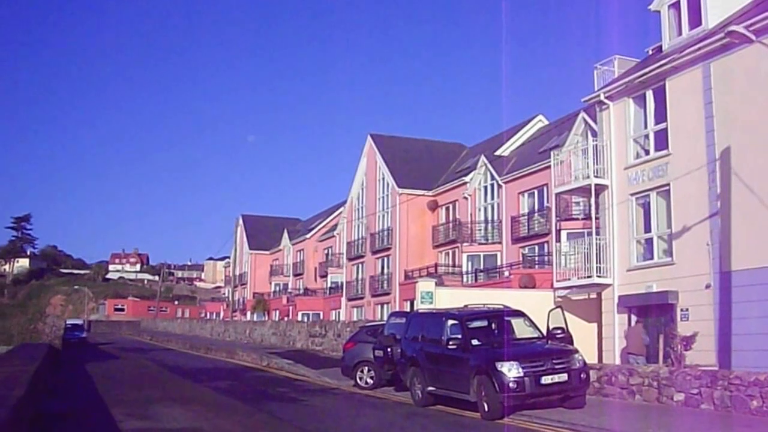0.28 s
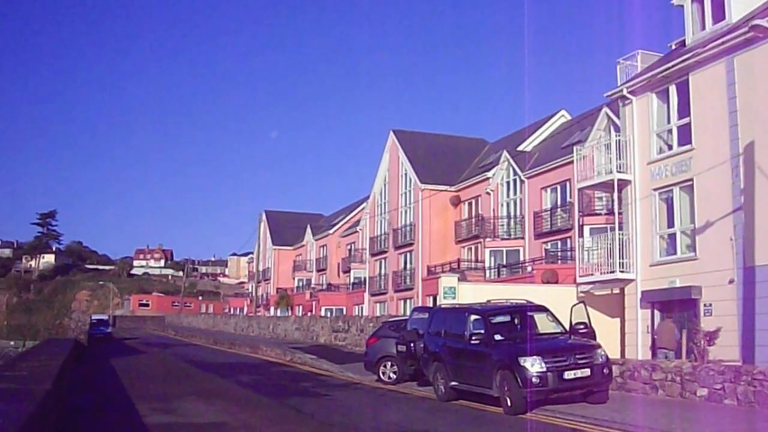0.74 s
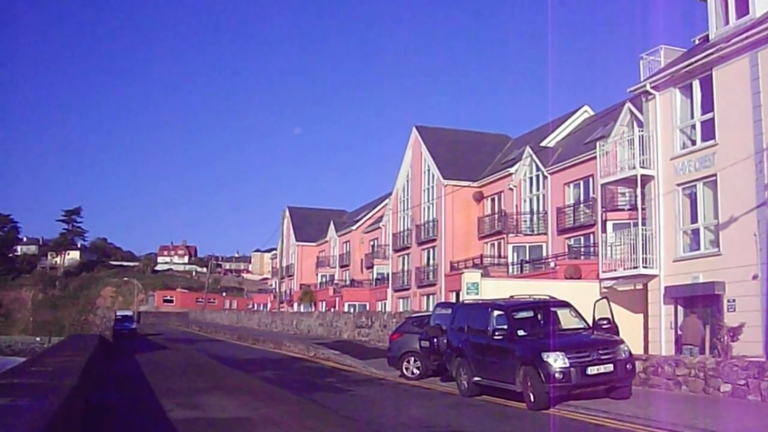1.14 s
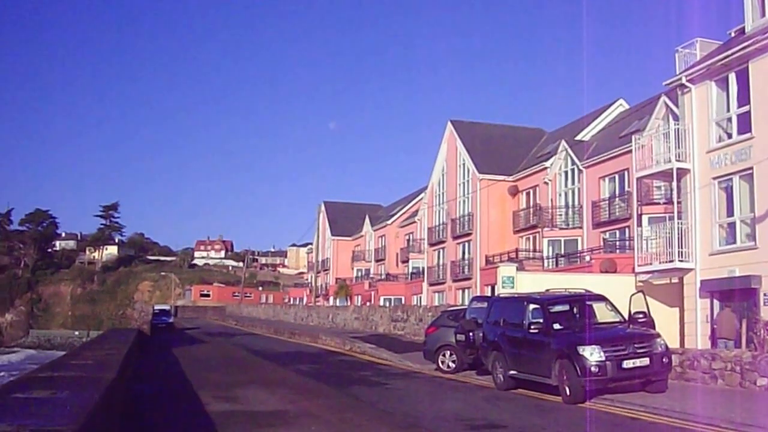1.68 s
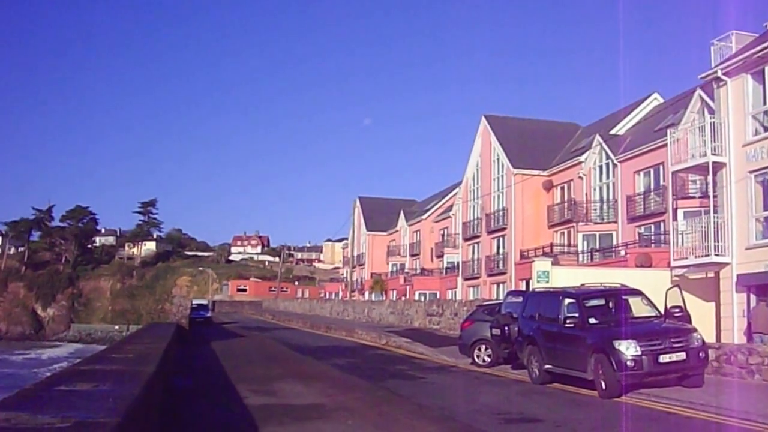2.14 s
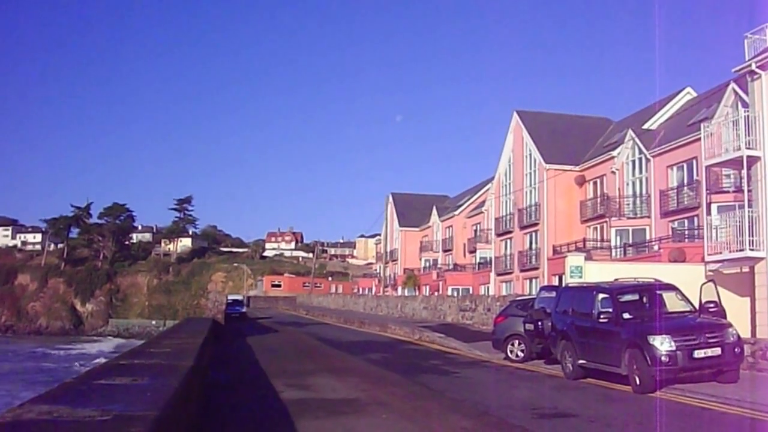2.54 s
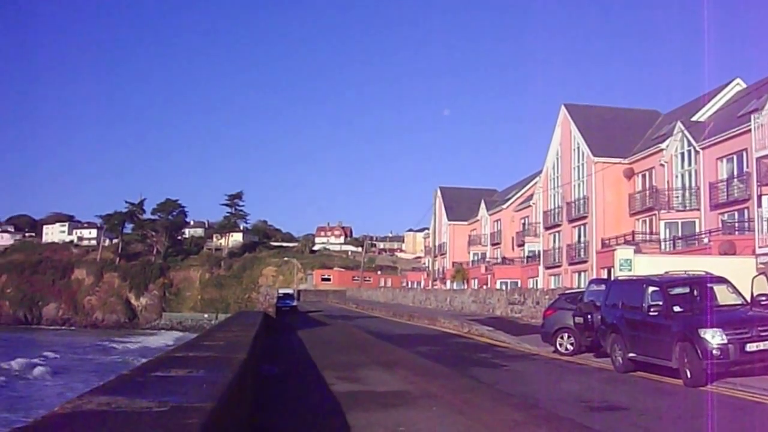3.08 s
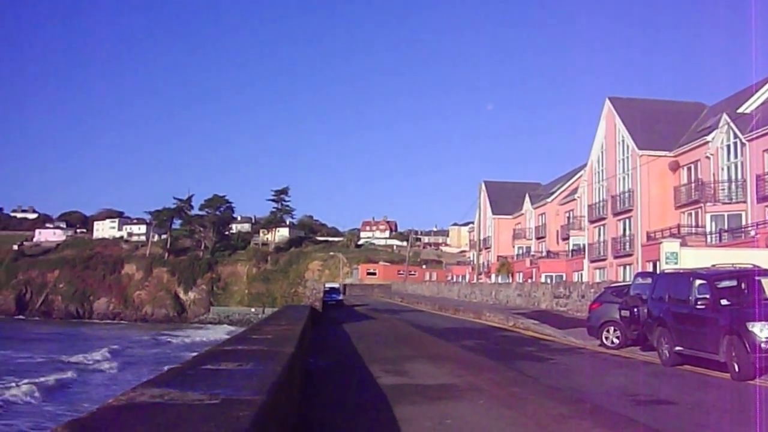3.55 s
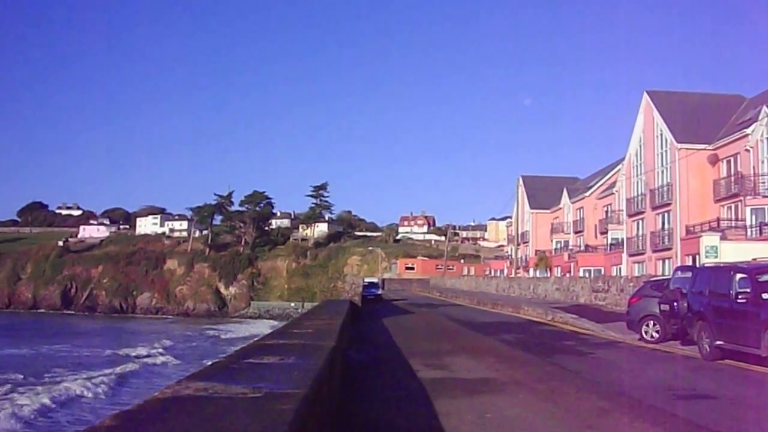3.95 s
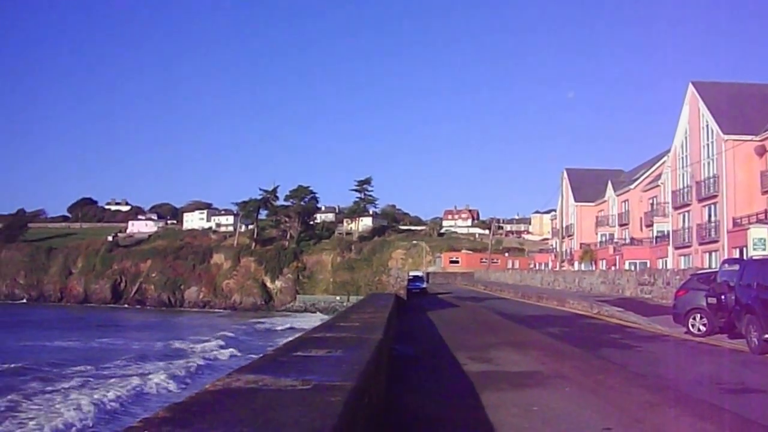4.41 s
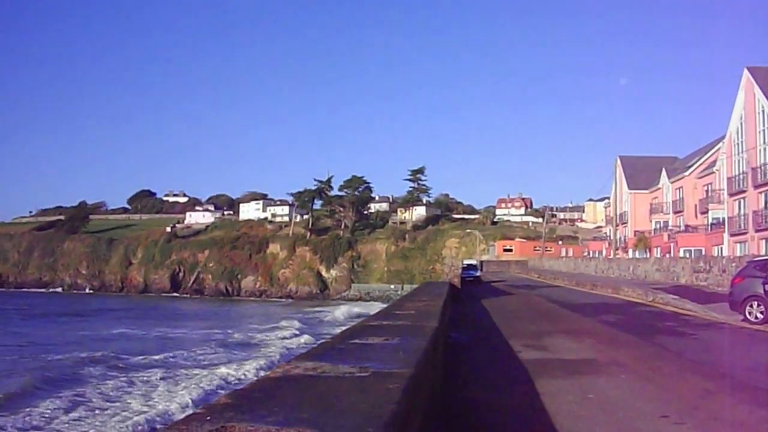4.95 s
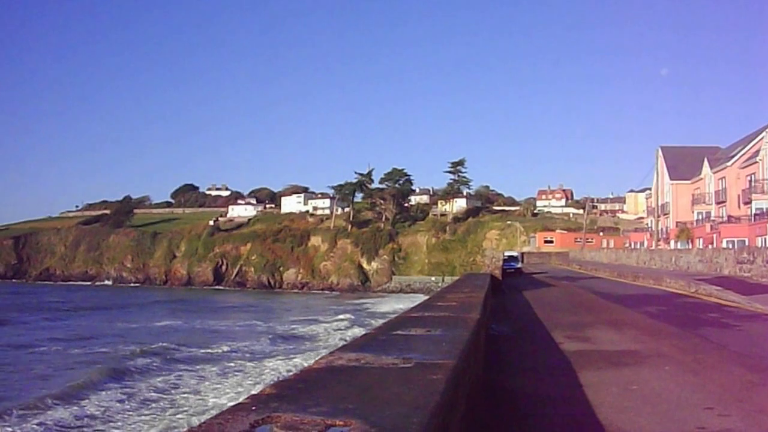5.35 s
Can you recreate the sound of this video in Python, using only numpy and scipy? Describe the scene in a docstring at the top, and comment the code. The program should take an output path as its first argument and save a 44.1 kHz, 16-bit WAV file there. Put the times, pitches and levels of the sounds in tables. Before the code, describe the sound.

A full, mostly low and middling sea roar runs throughout, with little treble and a bubbly hiss on top. Sharp case clicks and a distorted pop interrupt the opening, much louder than the water. Soft booms surface now and then. Near three seconds wind buffets the microphone in quick low thuds, then a stronger wave washes along the wall, and a short gust rumbles at the end.

```python
"""On a windy seafront, rough surf runs along a sea wall, heard through a small hand-held camera.
The surf is shaped noise: broken water roars, booms and washes while foam hisses with ringing bubbles.
Wind is low noise that follows gusts; eddies buffet the microphone with push-to-suction pulses.
Early on, contacts set the camera's case ringing in a few clicks, and one pressure pulse pops
and briefly chokes the microphone."""
import sys
import numpy as np
from scipy import signal
from scipy.fft import rfft, irfft
from scipy.io import wavfile

SR = 44100
rng = np.random.default_rng(int(sys.argv[2]) if len(sys.argv) > 2 else 0)


def wav_out(sig):
    """Save sig, one row per channel (or a flat mono array), as 16-bit PCM at SR to the path in sys.argv[1]."""
    wavfile.write(sys.argv[1], SR, np.round(np.clip(np.atleast_2d(sig).T, -1, 1) * 32767).astype(np.int16))


N = 246736
TIME = np.arange(N) / SR

# Relative spectra of roaring water, plunging booms, wash along the wall, foam and wind rumble:
# (frequency [Hz], relative level per hertz [dB])
ROAR_SPECTRUM = [(60, -22.5), (110, -5), (155, 0), (215, 0), (315, -0.5), (430, -2), (620, -3.5), (850, -4),
                 (1100, -9), (1400, -15.5), (1700, -22.5), (2300, -25.5), (3000, -40.5), (6000, -54)]
BOOM_SPECTRUM = [(90, -42), (240, 7.5), (320, 10), (410, 1.5), (650, -39), (2000, -89.5)]
WASH_SPECTRUM = [(400, -14), (700, -2), (1100, -0.5), (1450, 0.5), (1900, -9.5), (2800, -26), (6000, -59.5)]
FOAM_SPECTRUM = [(700, -4), (1500, 5.5), (1900, 5), (2350, 7.5), (2600, 2.5), (2850, -2.5), (3250, -3),
                 (3800, 1.5), (4250, -4), (4700, -4.5), (5300, -13), (5900, -19.5), (6400, -21.5),
                 (7000, -47)]
RUMBLE_SPECTRUM = [(10, -4.5), (25, 0.5), (50, 1), (90, 0.5), (150, -4.5), (300, -20.5), (700, -30.5),
                   (2000, -52.5)]

# Two waves running along the wall, the second stronger:
# (time [s], roar level [dB], boom level [dB], wash level [dB], foam level [dB])
SWELL_LEVELS = [(0, -25.5, -38, -45.5, -39), (0.5, -25, -38, -47, -39), (0.95, -24.9, -41, -41, -38.5),
                (1.25, -24, -35, -41, -38.5), (1.6, -24, -34, -39.5, -38), (2.3, -23, -35, -40.5, -37.5),
                (2.85, -24, -36, -47, -37.5), (3.15, -22, -38, -41, -37.5),
                (3.55, -22.9, -27.5, -38.5, -37), (4, -23.5, -33, -35.5, -37),
                (4.5, -23.5, -38, -37, -37.5), (4.85, -24.5, -31, -34.5, -37.5),
                (5.049, -24.5, -38.5, -38.5, -38), (5.59, -24.4, -39.5, -41.5, -38)]

# Gusts and lulls: (time [s], level over the breeze [dB], rise [s], fall [s])
WIND_GUSTS = [(0.1, -1.5, .15, .2), (0.62, 3, .1, 0.14), (1.369, 4, .05, 0.06), (2.11, 3.5, 0.072, 0.18),
              (2.881, 10.5, 0.035, 0.055), (3.05, 5.5, 0.14, 0.27), (3.38, 3.5, 0.064, 0.13),
              (5.2, -3.5, 0.14, 0.15), (5.58, 7.5, 0.065, 0.049)]

# Case contacts, the loud ones in quick pairs of strike and rebound:
# (time [s], ringing level [dB], centre of colour [Hz], spread of colour [octaves], crack level [dB])
CASE_CONTACTS = [(0.17893, -1, 1420, 0.26, -38), (0.18042, -4.5, 2765, 0.085, -36),
                 (0.33946, -8.5, 3950, 1.6, -21), (0.34044, -0.5, 3055, 0.17, -3.5),
                 (0.6195, -22, 1835, 0.8, -28), (0.63428, -5.3, 1850, 0.62, -10),
                 (0.63524, -10.5, 2250, 0.7, -20), (0.644, -23, 2440, 0.7, -28)]

# Resonant modes of the case: (frequency [Hz], relative level [dB], 60 dB decay time [s])
CASE_MODES = [(977, 1.5, .009), (1395, -9, 0.019), (1778, -0.6, 0.0046), (2469, -3.7, 0.015),
              (2769, -11.3, 0.012), (3603, -2.2, 0.009), (4892, -7, 0.006), (5813, -7, 0.003)]

# Eddies striking the microphone: (time [s], peak of the swing [dB], length of the swing [s],
# steepness of its front [ratio], lean [1 all push, -1 all suction])
EDDY_BUFFETS = [(0.2838, -11, 0.003, 1, 0), (0.3395, -9, .004, 3, .4), (2.891, -17, 0.008, 1.2, .6),
                (2.982, -9.5, 0.027, 1.3, .15), (3.012, -15, 0.024, 1, .7), (3.0439, -6.5, 0.006, 4, .1),
                (3.0568, -12, 0.0012, 1, 0), (3.0583, -4.5, 0.0055, 1, -.9), (3.15, -15, 0.022, 1, -.7),
                (3.1775, -10, 0.003, .9, .8), (3.335, -19, 0.018, 1, 0)]

# Plunging crests that trap throbbing air clouds:
# (time [s], level [dB], pitch [Hz], half length [s])
PLUNGING_CRESTS = [(1.004, -28, 320, .07), (1.594, -29, 280, 0.046), (2.272, -26, 215, 0.056),
                   (3.834, -30.5, 320, 0.15), (4.128, -33, 310, 0.046), (4.9, -30.5, 185, 0.057)]

BREEZE_DB, SLACKEN_DB_PER_S = -30, 0.37
LUMPY_DB = 1   # unevenness of the rumble
CRACK_T60_S = 0.0007
# tearing against the swing at a reference length, and its loss per doubling of that length
TEAR_DB, TEAR_REFERENCE_S, TEAR_LOSS_DB = -19, 0.008, 1.5
POP_S = 0.31145
CLOUD_OCTAVES = 0.5   # bandwidth of a cloud's throb
START_S, FADE_IN_S = 0.025, 0.027
MIC_TOP_HZ, CUTOFF_HZ = 6400, 15000


def from_db(db):
    """Logarithmic level: 20 dB is a tenfold amplitude ratio."""
    return 10 ** (np.asarray(db) / 20)


def rms_one(x):
    """Power normalisation: divide by the root mean square."""
    return x / np.sqrt(np.mean(x ** 2) + 1e-20)


def coloured(x, spectrum):
    """Spectral shaping: weight each frequency, then scale to unit power."""
    hz, db = np.transpose(spectrum)
    grid = np.maximum(np.arange(N // 2 + 1) * SR / N, 1)
    gain = from_db(np.interp(np.log(grid), np.log(hz), db))
    return rms_one(irfft(rfft(x) * gain, N))


def drift(rate):
    """Low-passed noise: a random course of unit spread, changing about rate times a second."""
    step = 40   # samples between slow values
    r = np.exp(-2 * np.pi * rate * step / SR)
    steps = rng.standard_normal(N // step + 2002)
    slow = signal.lfilter([1], [1, -2 * r, r * r], steps)[2000:]   # settled part
    return np.interp(np.arange(N) / step, np.arange(len(slow)), rms_one(slow))


def ring(impulses, hz, t60):
    """Damped resonance: each unit impulse excites an exponentially decaying sine."""
    r = np.exp(-np.log(1000) / (t60 * SR))
    w = 2 * np.pi * hz / SR
    return signal.lfilter([0, np.sin(w)], [1, -2 * r * np.cos(w), r * r], impulses + 1e-18)


def band_noise(white, band):
    """Band-pass filtering: keep the noise between two frequencies."""
    return signal.sosfilt(signal.butter(2, band, "band", fs=SR, output="sos"), white)


def churn(patchy_db, rate, count=14):
    """Bubble-cloud noise: bands swell separately as clouds of different sizes form and die."""
    edges = np.geomspace(50, 8000, count + 1)
    white = rng.standard_normal((2, N))
    out = 0
    for k, band in enumerate(zip(edges, edges[1:])):
        noise = band_noise(white[k % 2], band)   # neighbours use independent noise
        out = out + noise * from_db(patchy_db * drift(rate))
    return rms_one(out)


def bubbles(per_s, spread_db, cycles, count=24):
    """Bubble resonance: bursts in clumps ring at set pitches, decaying 60 dB in a few cycles."""
    sizes = from_db(spread_db * np.minimum(rng.exponential(1, N), 4)) * rng.choice([-1, 1], N)
    chance = per_s * from_db(3 * drift(7)) / SR
    bursts = sizes * (rng.random(N) < chance)
    dealt = rng.integers(0, count, N)   # pitch number of each burst
    out = np.zeros(N)
    for k, hz in enumerate(np.geomspace(900, 6000, count)):
        out += hz * ring(bursts * (dealt == k), hz, cycles / hz)
    return rms_one(out)


def surf():
    """Turbulent bubbly flow: water roars, booms and washes; its foam hisses and fizzes."""
    s, *levels = np.transpose(SWELL_LEVELS)
    roar_db, boom_db, wash_db, foam_db = [np.interp(TIME, s, db) for db in levels]
    roar = from_db(roar_db) * coloured(churn(patchy_db=0.5, rate=5.0), ROAR_SPECTRUM)
    boom = from_db(boom_db) * coloured(churn(patchy_db=3.0, rate=3.9), BOOM_SPECTRUM)
    wash = from_db(wash_db) * coloured(churn(patchy_db=0.5, rate=10), WASH_SPECTRUM)
    hiss = churn(patchy_db=0.74, rate=21)
    fizz = from_db(-10) * bubbles(per_s=3000, spread_db=1.0, cycles=6)
    foam = from_db(foam_db) * coloured(hiss + fizz, FOAM_SPECTRUM)
    unevenness = from_db(0.19 * drift(11))
    return (roar + boom + plunges() + wash + foam) * unevenness


def wind():
    """Turbulent pressure at the microphone port: a lumpy low rumble swells and dies with gusts."""
    gust_db = 0
    for s, db, rise, fall in WIND_GUSTS:
        past = TIME - s
        gust_db = gust_db + db * np.exp(-(past / np.where(past < 0, rise, fall)) ** 2)
    rumble_db = BREEZE_DB - SLACKEN_DB_PER_S * TIME + gust_db
    lumps = rng.standard_normal(N) * from_db(LUMPY_DB * drift(21))
    return from_db(rumble_db) * coloured(lumps, RUMBLE_SPECTRUM)


def case_clicks():
    """Modal excitation: a contact cracks and rings the case, favouring modes near its colour."""
    s, db, centre_hz, octaves, crack_db = np.transpose(CASE_CONTACTS)
    out = np.zeros(N)
    for start, hz, gain in zip(s, centre_hz, from_db(crack_db)):
        out += gain * ring(np.arange(N) == round(start * SR), hz, CRACK_T60_S)
    for k, (hz, mode_db, t60) in enumerate(CASE_MODES):
        nearness = np.exp(-.5 * (np.log2(hz / centre_hz) / octaves) ** 2)
        taps = np.zeros(N)
        taps[np.round(s * SR).astype(int)] = from_db(db + mode_db) * nearness
        out += (-1) ** k * ring(taps, hz, t60)   # modes alternate in sign
    return out


def buffets():
    """Vortex passage: pressure flips from push to suction, by its lean, as the air tears a little."""
    out = np.zeros(N)
    tearing = coloured(rng.standard_normal(N), ROAR_SPECTRUM)
    for s, db, length, steepness, lean in EDDY_BUFFETS:
        u = 4 * (TIME - s) / length
        passing = np.exp(-u * u / 2)
        swing = (lean - np.tanh(steepness * u)) * passing
        swing = swing / np.abs(swing).max()
        # quick eddies tear more
        tear_db = TEAR_DB - TEAR_LOSS_DB * np.log2(length / TEAR_REFERENCE_S)
        out += from_db(db) * (from_db(tear_db) * tearing * passing + swing)
    return out


def pop(air, pulse_db=10, pulse_s=0.00123, creep_db=1.5, fall_s=0.0011, choke_db=-11, recover_s=0.016):
    """Overload and recovery: a pulse pins the microphone, which creeps back and stays weak briefly."""
    after = TIME >= POP_S
    since = np.maximum(TIME - POP_S, 0)
    stroke = np.minimum(since / pulse_s, 1)
    # the levels scale these shapes, whose own peaks lie below 1
    pulse = from_db(pulse_db) * np.sin(np.pi * stroke) * (1 - stroke)   # sharp front, slower back
    creep = from_db(creep_db) * stroke * np.exp(-since / fall_s)
    sensitivity = from_db(choke_db * after * np.exp(-(since / recover_s) ** 2))
    return air * sensitivity - pulse - creep


def plunges():
    """Collective bubble oscillation: each crest's air cloud swells and fades at its low pitch."""
    out = np.zeros(N)
    for s, db, hz, half_length in PLUNGING_CRESTS:
        band = hz * 2 ** (CLOUD_OCTAVES * np.array([-.5, .5]))
        cloud = rms_one(band_noise(rng.standard_normal(N), band))
        out += from_db(db) * cloud * np.exp(-((TIME - s) / half_length) ** 2)
    return out


def scene():
    """Superposition: sea, wind and case sounds add at one microphone, which the pop chokes."""
    return pop(surf() + wind() + case_clicks() + buffets())[None, :]


def record(dry):
    """Band limitation and clipping: sound fades in from silence, a narrow microphone limits it,
    peaks flatten and the top is cut."""
    faded_in = dry * np.clip((TIME - START_S) / FADE_IN_S, 0, 1)
    narrow = signal.sosfilt(signal.butter(26, MIC_TOP_HZ, fs=SR, output="sos"), faded_in)
    clipped = np.clip(narrow, -.96, .96)
    return signal.sosfilt(signal.butter(12, CUTOFF_HZ, fs=SR, output="sos"), clipped)


dry = scene()
out = record(dry)
wav_out(out)
```